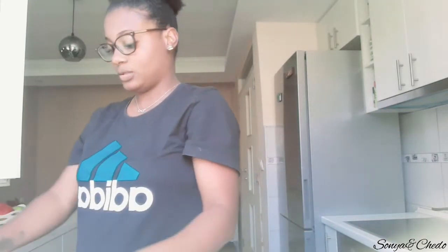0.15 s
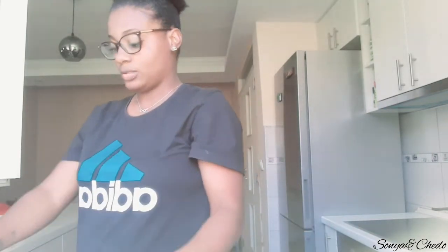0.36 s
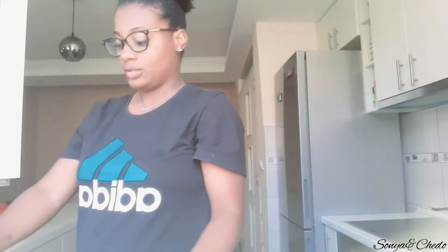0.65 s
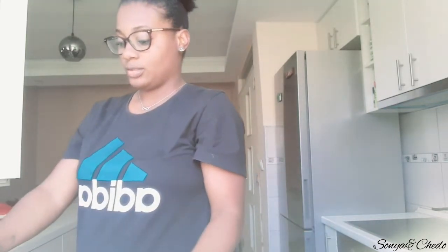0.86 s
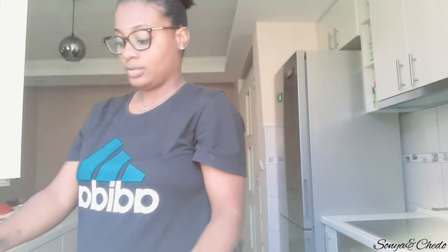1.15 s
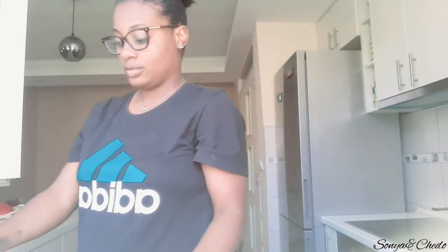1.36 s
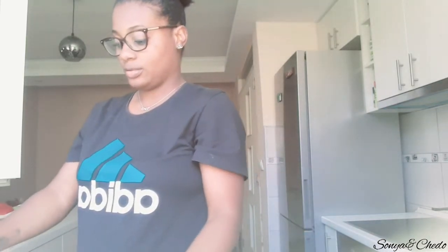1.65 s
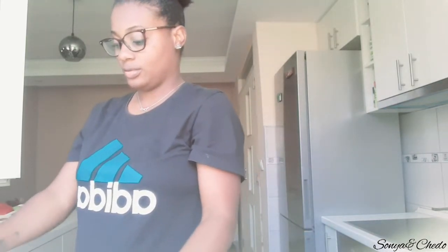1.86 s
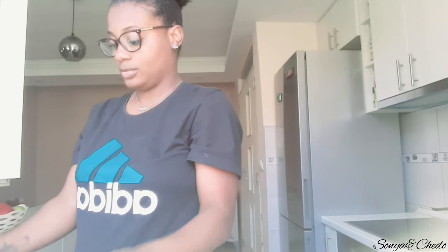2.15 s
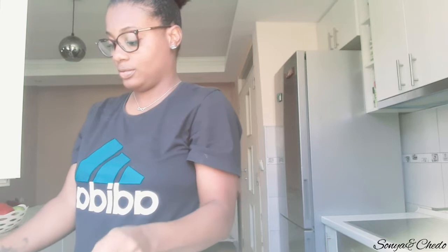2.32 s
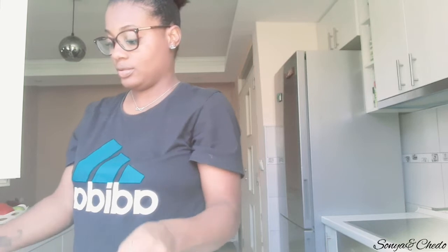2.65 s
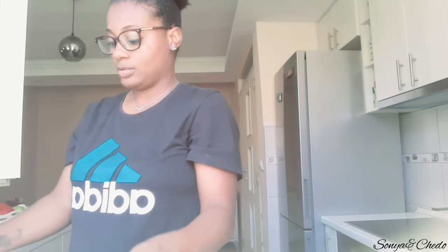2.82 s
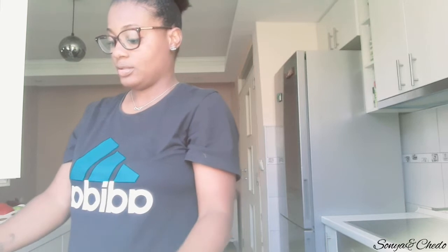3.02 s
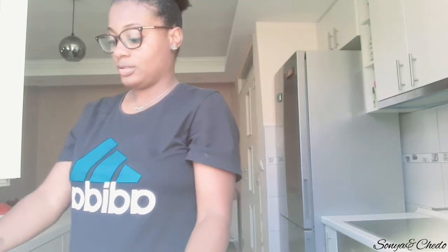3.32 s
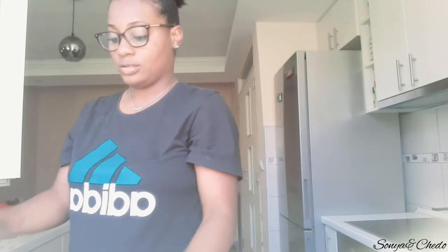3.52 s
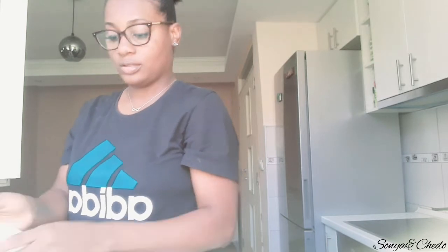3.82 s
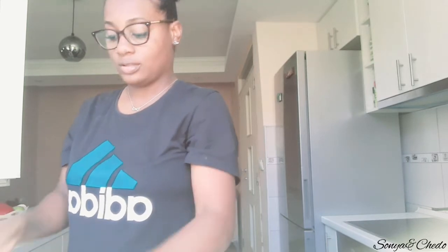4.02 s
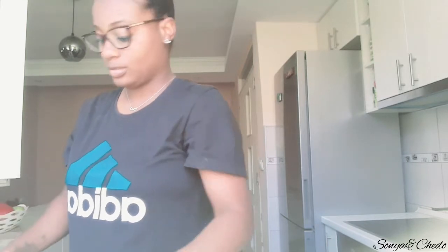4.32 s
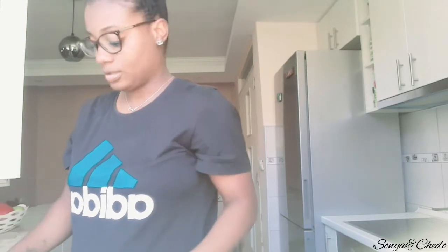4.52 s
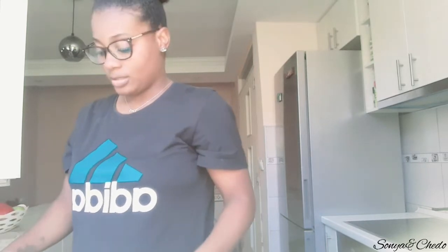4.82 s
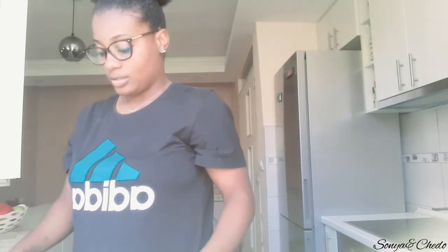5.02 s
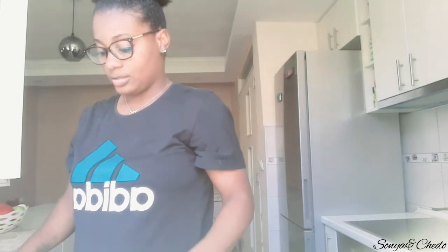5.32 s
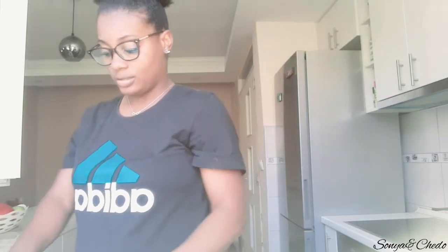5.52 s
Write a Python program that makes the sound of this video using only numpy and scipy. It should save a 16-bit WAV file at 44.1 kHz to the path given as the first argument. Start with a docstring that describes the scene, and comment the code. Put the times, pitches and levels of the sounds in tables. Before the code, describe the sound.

Foil is pressed into a baking dish on a kitchen counter, heard close in mono. From 0 s, thin bright crackles and snaps come in quick clumps, while the dish knocks and rattles in the first 0.2 s. Squeezes continue unevenly, with faint ringing taps around 0.6 and 1.0 s and sharper foil pops near 1.7, 2.0 and 2.7 s. At about 2.9 s the dish bangs the counter in a loud, short, clattering run. Crinkling goes on more softly, then almost stops from 3.5 to 4.1 s, leaving low airy house noise and barely audible mains hum. A hard, ringing knock strikes at 4.15 s, followed by a duller low rustle and a pop at 4.3 s. Bright crumpling returns from 4.4 s, with a tiny stick-slip judder at 4.75 s, and thins out after 5.2 s to near quiet by 5.5 s. Brief hard-room echoes surround everything.

```python
"""Kitchen counter: hands press a sheet of aluminium foil into a baking dish, close to a mono phone microphone.
Thousands of tiny creases snap in clumps, each a short ringing facet, and follow the squeezes of the hands.
The dish knocks and rattles as a set of ringing modes, and once judders on the counter by stick and slip.
The hard kitchen answers with brief echoes, over the air noise of the house and a faint mains hum."""
import sys
import numpy as np
from scipy import signal
from scipy.fft import rfft, irfft
from scipy.io import wavfile
from scipy.ndimage import uniform_filter1d

SR = 44100
rng = np.random.default_rng(int(sys.argv[2]) if len(sys.argv) > 2 else 0)


def unload_wav(signal):
    """Save mono or channel-first audio to the path in sys.argv[1] as 16-bit WAV at rate SR, clipped to [-1, 1]."""
    wavfile.write(
        sys.argv[1],
        SR,
        np.round(np.clip(np.atleast_2d(signal).T, -1, 1) * 32767).astype(np.int16),
    )


N = 249606

# modes of dish and counter top: f/Hz, relative level/dB, t60/s of a free ring, before it is scaled
DISH_MODES = [(135, 3.5, 0.3), (273, -10, 0.45), (408, 2.5, 0.096), (500, -2, 0.25), (527.4, -7.5, 0.17),
              (630, 2.5, 0.14), (728, -4.5, 0.11), (794, -8, 0.22), (986, -3, 0.2), (1178, -9.5, 0.26),
              (1523, -0.5, 0.11), (1550, -7.5, 0.34), (1633, -3.5, 0.22), (1777, 4.5, 0.16),
              (2060, -0.5, 0.12), (2460, 1, 0.068), (3110, 7.5, 0.046), (3610, 7.5, 0.071)]


def foil():
    """Snaps coloured by the sheet; fine creases brighten it, pressure also shakes the dish."""
    # foil as it reaches the microphone: f/Hz, relative level/dB
    foil_colour = [(88, -45), (150, -9.5), (205, -23), (268, -17.5), (572, -15.5), (643, -9.5),
                   (1370, -12.5), (1570, -7.5), (2020, -11.5), (3100, -5.5), (6860, 2.5), (8330, -12.5),
                   (12300, -5.5), (15500, -6.5)]
    crumple, fine, pressure = hands()
    sheet = colour(creases(per_s=24000, spread_db=1.5, cycles=2.96), foil_colour)
    low = signal.sosfiltfilt(signal.butter(2, 2200, fs=SR, output="sos"), sheet)
    top = signal.sosfiltfilt(signal.butter(4, 8200, "high", fs=SR, output="sos"), sheet)
    middle = sheet - low - top
    tap_size = gain_of(9.9 * np.minimum(rng.exponential(1, N), 2.5))
    taps = tap_size * (rng.random(N) < 300 / SR) * rng.choice([-1, 1], N)  # 300 a second
    shaken_dish = signal.oaconvolve(taps, dish_ring())[:N]
    body = evened(low) + 0.43 * evened(shaken_dish)
    return crumple * evened(middle) + fine * evened(top) + pressure * body


def hands():
    """Gains of crumpling, top treble and low rustle: the squeezes add up in power."""
    # squeezes of the hands: t/s when full, hold/s, crumpling level/dB before the mix
    squeezes = [(0.029, 0.023, -21), (0.094, 0.15, -20), (0.306, 0.075, -25), (0.44, 0.0093, -25.5),
                (0.501, 0.019, -17.5), (0.57, 0.018, -25), (0.627, 0.013, -15.5), (0.724, 0.048, -18),
                (0.847, 0.0083, -15), (0.951, 0.1, -16), (1.084, 0.022, -22), (1.145, 0.0072, -20),
                (1.26, 0.0078, -23), (1.293, 0.26, -18), (1.684, 0.039, -16.5), (1.765, .21, -18.5),
                (2.025, 0.075, -20.5), (2.144, 0.26, -18.5), (2.492, 0.091, -16), (2.64, 0.046, -20.5),
                (2.745, 0.0076, -25), (2.824, 0.0066, -16), (2.905, 0.021, -21.5), (3.028, 0.14, -22.5),
                (3.154, 0.094, -21.5), (3.29, 0.054, -27), (3.396, 0.0092, -21.5), (3.458, 0.014, -29),
                (3.72, .002, -40.5), (3.798, 0.028, -59), (4.027, 0.04, -38), (4.117, 0.026, -25),
                (4.259, .005, -34.5), (4.326, 0.015, -28), (4.387, 0.084, -22), (4.5, 0.067, -18.5),
                (4.592, 0.069, -24), (4.754, 0.026, -15), (4.852, 0.083, -21.5), (4.996, 0.011, -17),
                (5.086, 0.14, -24), (5.265, 0.013, -30.5), (5.372, 0.01, -43.5), (5.655, .02, -51)]
    # colour of the rustle: t/s, top treble level/dB, low rustle level/dB, both relative to the crumpling
    rustle = [(0, 2, -6), (.5, 2.5, -11.5), (1.1, -1.5, -13), (2.3, 0.5, -11.5), (2.8, 1, -14),
              (3.05, 1, -9.5), (3.45, 0.5, -9), (3.6, -5, -7), (4.1, -0.5, -4.5), (4.15, -9, 3),
              (4.24, -7, 8.5), (4.33, 0, 0.5), (4.5, 0.5, -9), (5.0, 3, -10.5), (5.3, 2, -6),
              (5.66, -8, -7)]
    base_rise_s, rise_growth_per_db = 0.052, 0.1423  # rise at -20.5 dB; lighter touches set in quicker
    fall_db_per_s = 211
    settle_db, settle_db_per_s = -18, 85.5  # the sheet keeps ticking softly after the hand lets go

    coarse_t = np.arange(0, N + 100, 100)[:, None] / SR
    full_s, hold_s, db = np.transpose(squeezes)
    rise_s = base_rise_s * np.exp(rise_growth_per_db * (db + 20.5))
    press = swell(full_s, hold_s, rise_s, fall_db_per_s, coarse_t)
    settling = gain_of(settle_db) * swell(full_s, hold_s, rise_s, settle_db_per_s, coarse_t)
    power = (press ** 2 + settling ** 2) @ gain_of(db) ** 2

    t = np.arange(N) / SR
    crumple = np.interp(t, coarse_t[:, 0], np.sqrt(power))
    s, top_db, low_db = np.transpose(rustle)
    fine = crumple * gain_of(np.interp(t, s, top_db))
    pressure = crumple * gain_of(np.interp(t, s, low_db))
    return crumple, fine, pressure


def creases(per_s, spread_db, cycles, count=40):
    """Each snapping crease rings one small facet, which decays to 1/e in the given cycles at 4 kHz."""
    size = gain_of(spread_db * np.minimum(rng.exponential(1, N), 5))
    snaps = size * (rng.random(N) < per_s / SR) * rng.choice([-1, 1], N)
    snaps *= avalanches(per_s=45, strength=0.26, decay_s=0.0033)
    snaps *= gain_of(0.27 * wander(0.0063) + 1.7 * wander(0.0095))  # uneven level

    facet = rng.integers(0, count, N)
    out = np.zeros(N)
    t = np.arange(512) / SR
    facets_hz = np.linspace(np.sqrt(200), np.sqrt(15500), count) ** 2  # higher octaves hold more facets
    for k, hz in enumerate(facets_hz):
        ring = np.sin(2 * np.pi * hz * t) * np.exp(-t * np.sqrt(hz * 4000) / cycles)
        out += signal.oaconvolve(snaps * (facet == k), ring * np.sqrt(hz / 1000))[:N]
    return out


def avalanches(per_s, strength, decay_s):
    """Gain on the snapping: one crease sets off its neighbours, suddenly, and the run dies away."""
    # a fold gives way all at once: t/s, level/dB relative to the crumpling around it
    buckles = [(1.044, 6.5), (1.089, 7.5), (1.323, 8), (1.69, 8), (1.778, -1), (1.828, 4.5), (1.96, 9),
               (2.7, 11.5), (3.722, 2), (4.309, 14.5), (4.536, 4.5), (4.885, 4)]
    buckle_fade_s = 0.0098
    starts = strength * rng.exponential(1, N) * (rng.random(N) < per_s / SR)
    gain = 1 + signal.lfilter([1], [1, -np.exp(-1 / (decay_s * SR))], starts)
    t = np.arange(N) / SR
    for s, db in buckles:
        fade = np.exp(-np.maximum(t - s, 0) / buckle_fade_s)
        gain = gain * gain_of(db * fade * (t >= s))
    return gain


def knocks():
    """A short crack and the ring of the dish at each blow; the pitch of the blow colours both."""
    # dish against counter: t/s, level/dB, favoured f/Hz, width of that preference/octaves
    blows = [(0.024, -9.5, 910, 1.1), (0.0281, -9, 1630, 0.13), (.027, -11, 504, 0.11),
             (.036, -9.5, 527, 0.19), (0.057, -20, 1600, 0.13), (.064, -17, 1650, .12),
             (.088, -19, 1580, 0.095), (.088, -12, 420, 0.5), (.097, -14.5, 512, 0.08),
             (.13, -17, 507, 1.6), (.162, -22.5, 600, 1.1), (0.48, -32, 201, 0.54),
             (.498, -30, 1160, 0.087), (0.454, -23, 190, 0.64), (.54, -25.5, 190, 0.55),
             (0.579, -23, 220, 0.55), (0.595, -17.5, 1580, 0.1), (0.62, -22, 1530, 0.091),
             (0.739, -21, 1550, 0.11), (0.952, -15.5, 1740, 0.24), (1.003, -19, 1780, 0.13),
             (1.044, -17, 1600, 0.21), (2.305, -19.5, 654, 0.41), (2.8684, -3.5, 1690, 0.65),
             (2.869, -1.5, 426, 0.94), (2.879, -9, 560, 0.83), (2.898, -7, 800, 0.87),
             (2.912, -7, 1300, 0.64), (2.914, -18, 135, 0.27), (2.915, -6.5, 490, 2.4),
             (2.923, -8.5, 497, 0.24), (2.936, -8, 547, 0.66), (2.94, -10.5, 1740, 0.1),
             (2.946, -16, 513, 0.16), (2.96, -14, 560, 0.6), (3.723, -27.5, 200, 0.43),
             (4.1446, -2, 1580, 1.6), (4.1445, -4, 1550, 0.06), (4.148, -14, 136, 0.35),
             (4.175, -15, 1560, 0.1), (4.231, -30, 1530, .05), (4.258, -15, 393, .7),
             (4.261, -20.5, 3610, .05), (4.262, -21, 2070, .08), (4.267, -16, 650, .3),
             (4.309, -14.5, 137, 1.6), (4.355, -22, 140, 0.45), (4.37, -34, 2060, 0.33),
             (4.394, -18.5, 970, 0.11), (4.439, -18, 1700, 0.7), (4.729, -21, 388, 0.14),
             (5.271, -21, 1426, 0.81), (5.501, -42, 900, 0.87)]
    held_ring = 0.34  # a hand on the dish shortens its ring by this factor
    out = np.zeros(N + SR)
    cracks = rng.standard_normal((len(blows), 1500)) * np.exp(-np.arange(1500) / 63.0)
    # each blow starts the modes partly out of step, in turns, for a softer onset
    phases = 0.37 * rng.random((len(blows), len(DISH_MODES)))
    for (s, db, hz, octaves), crack, phase in zip(blows, cracks, phases):
        ring = dish_ring(hz, octaves, held_ring, phase)
        ring /= abs(ring).max()
        span = 1.2 + 1.3 * octaves  # the crack reaches this factor below and above the pitch
        band = signal.butter(2, [hz / span, hz * span], "band", fs=SR, output="sos")
        crack = signal.sosfilt(band, crack)
        ring[:1500] += 0.41 * crack / abs(crack).max()
        out[round(s * SR):][:len(ring)] += gain_of(db) * ring
    # keeps the knocks free of a deep thump
    return signal.sosfilt(signal.butter(2, 95, "high", fs=SR, output="sos"), out[:N])


def dish_ring(favoured_hz=700., octaves=9., ring_time=0.93, turns=0):
    """Response of the dish to one blow, which weights the modes near its own pitch; ring_time scales t60."""
    t = np.arange(SR // 3)[:, None] / SR
    hz, db, t60 = np.transpose(DISH_MODES)
    near = np.exp(-.5 * (np.log2(hz / favoured_hz) / octaves) ** 2)
    contact = 1 - np.exp(-t / 0.00039)  # the push builds up while the two surfaces meet
    decay = gain_of(db - 60 * t / (t60 * ring_time))
    modes = near * contact * decay * np.sin(2 * np.pi * (hz * t + turns))
    return modes.sum(1)


def judder():
    """Regular stick and slip: overtones of the slip rate, the second one sitting on a dish mode."""
    # the dish slides and judders: t/s when full, hold/s, level/dB
    slides = [(4.731, 0.0066, -11), (4.754, 0.019, -14.5)]
    slips_hz, rise_s, fall_db_per_s = 320.3, 0.0056, 1812
    overtones_db = [-18, -1.5, -11, -18.0, -15]
    t = np.arange(N) / SR
    turns = np.cumsum(slips_hz * (1 + 0.008 * wander(0.0042))) / SR
    slips = sum(gain_of(db) * np.sin(2 * np.pi * k * turns) for k, db in enumerate(overtones_db, 1))
    level = sum(gain_of(db) * swell(s, hold_s, rise_s, fall_db_per_s, t) for s, hold_s, db in slides)
    return slips * level


def kitchen(x, count=5):
    """Sound comes from spots taken in turn, 12 ms apart, each with its own pattern of reflections."""
    spot = np.arange(N) / SR / .012
    away = [(spot - k + count / 2) % count - count / 2 for k in range(count)]
    shares = [np.cos(np.pi / 2 * np.clip(d, -1, 1)) for d in away]  # crossfade between neighbours
    return sum(signal.fftconvolve(x * share, echoes())[:N] for share in shares)


def echoes():
    """Sparse reflections of random sign, each band dying at its own speed."""
    # ring of the room: f/Hz, t60/s
    room_t60 = [(150, 0.36), (1000, 0.39), (4000, 0.27), (14000, 0.071)]
    taps = np.zeros(SR // 2)
    at = np.arange(150, len(taps) - 20, 20)
    taps[at + rng.integers(0, 20, len(at))] = rng.choice([-1., 1.], len(at))
    hz, t, bands = signal.stft(taps, SR, nperseg=256)
    fade = gain_of(-60 * t / read(room_t60, hz)[:, None])
    tail = signal.istft(bands * fade, SR, nperseg=256)[1]
    return tail / np.linalg.norm(tail)


def house():
    """Air noise drifting in patches of time and pitch, and a faint mains hum."""
    # air noise of the house: f/Hz, relative level/dB
    air_colour = [(21, -47), (35, -15), (97, -1), (125, -7), (237, -7), (269, -2.5), (306, -7.5),
                  (500, -12.5), (657, -6.5), (960, -10), (1400, -21), (2200, -38.5), (6500, -39),
                  (9300, -48), (15500, -36.5)]
    air_db, mains_hz, mains_db = -38.5, 50, -53
    frames = N // 256 + 5
    patches = uniform_filter1d(rng.standard_normal((513, frames)), 8, 0)  # smooth in pitch
    patches = evened(uniform_filter1d(patches, 12, 1))  # smooth in time
    a, b = rng.standard_normal((2, 513, frames))
    air = signal.istft((a + 1j * b) * gain_of(2.4 * patches), nperseg=1024, noverlap=768)[1][:N]
    hum = np.sqrt(2) * np.sin(2 * np.pi * mains_hz * np.arange(N) / SR)
    hum_gain = gain_of(mains_db + 1.6 * wander(.04))
    return gain_of(air_db) * evened(colour(air, air_colour)) + hum_gain * hum


def swell(full_s, hold_s, rise_s, fall_db_per_s, t):
    """Gain that rises in a straight line, holds at 1 and dies away."""
    rise = np.clip(1 + (t - full_s) / rise_s, 0, 1)
    return rise * gain_of(-fall_db_per_s * np.maximum(t - full_s - hold_s, 0))


def wander(seconds):
    """Smooth random curve of rms 1 that changes over the given time."""
    size = max(round(seconds * SR), 1)
    return evened(uniform_filter1d(uniform_filter1d(rng.standard_normal(N), size), size))


def colour(x, points):
    """Shapes the spectrum of x by a table of f/Hz, level/dB."""
    hz = np.fft.rfftfreq(len(x), 1 / SR)
    return irfft(rfft(x) * gain_of(read(points, hz)), len(x))


def read(points, hz):
    """Reads a table at any frequency, in straight lines over log frequency."""
    f, value = np.transpose(points)
    return np.interp(np.log(hz + 1), np.log(f + 1), value)


def evened(x):
    """Scales x to rms 1."""
    return x / np.sqrt(np.mean(x ** 2) + 1e-20)


def gain_of(db):
    """Amplitude factor of a level in dB."""
    return 10 ** (np.asarray(db) / 20)


def scene():
    """One microphone feeds both channels; the judder is short and close, almost without echo."""
    sheet, blows, slide = foil(), knocks(), judder()
    sent = gain_of(-9) * sheet + gain_of(-9.5) * blows + gain_of(-34) * slide
    mono = gain_of(-2.5) * sheet + blows + slide + kitchen(sent) + house()
    return np.array([mono, mono])


def record(dry):
    """The microphone drops the deepest bass, peaks are squeezed at full scale; then the band limit."""
    heard = signal.sosfilt(signal.butter(6, 42, "high", fs=SR, output="sos"), dry)
    squeezed = heard / (1 + abs(heard) ** 8) ** (1 / 8)
    band_limit = signal.firwin(1023, 15620, window=("kaiser", 12), fs=SR)  # edge in Hz
    return signal.oaconvolve(squeezed, band_limit[None], "same")


dry = scene()
out = record(dry)
unload_wav(out)
```